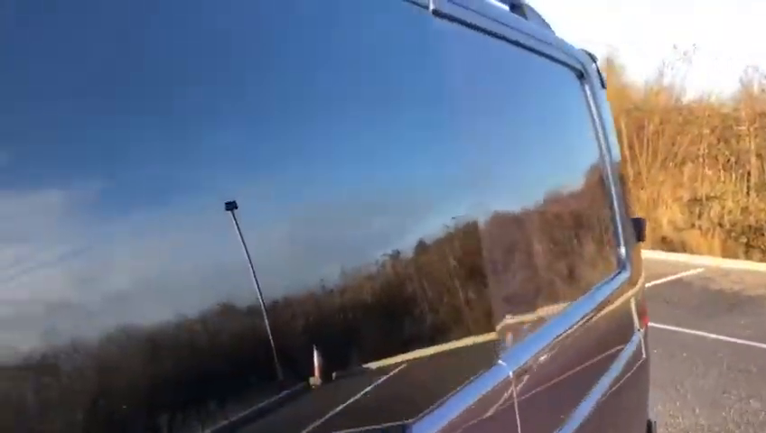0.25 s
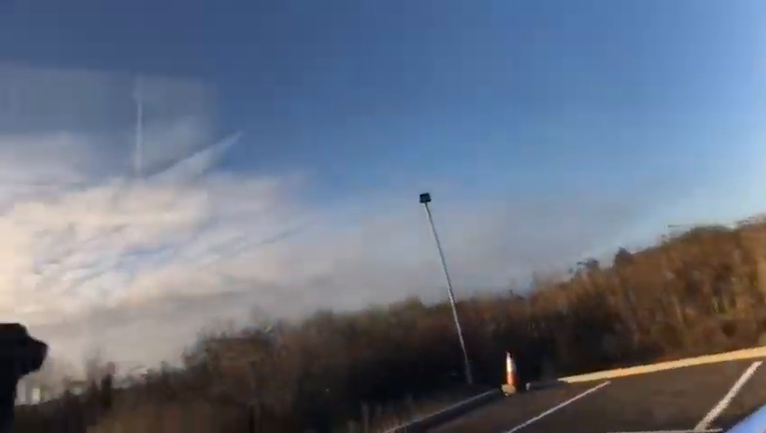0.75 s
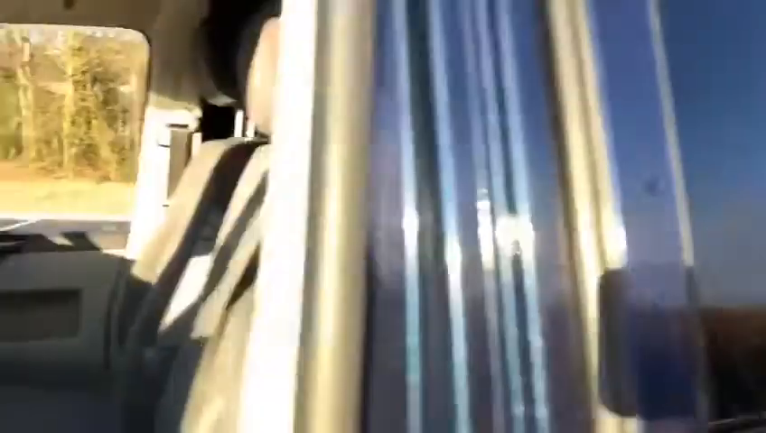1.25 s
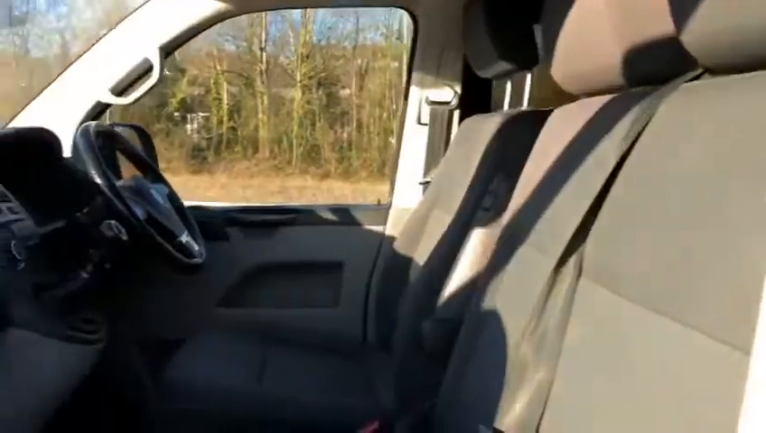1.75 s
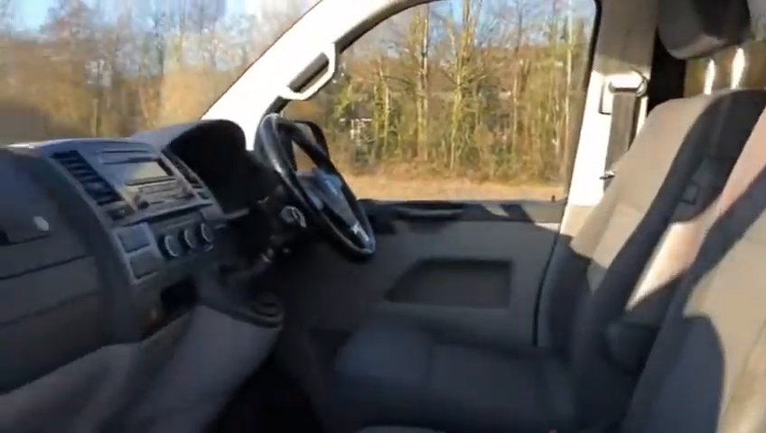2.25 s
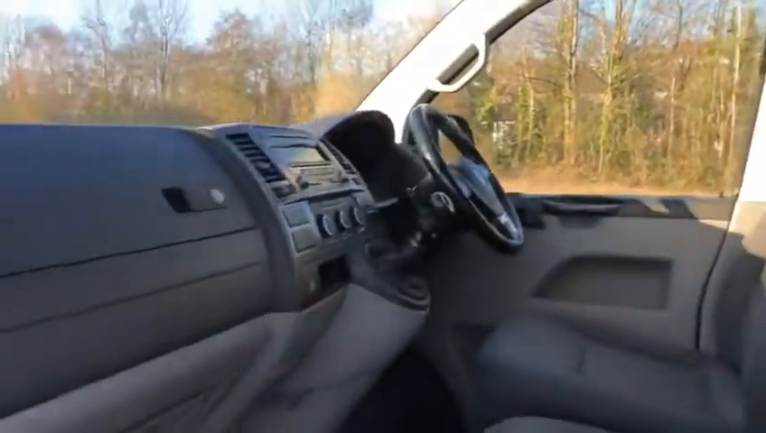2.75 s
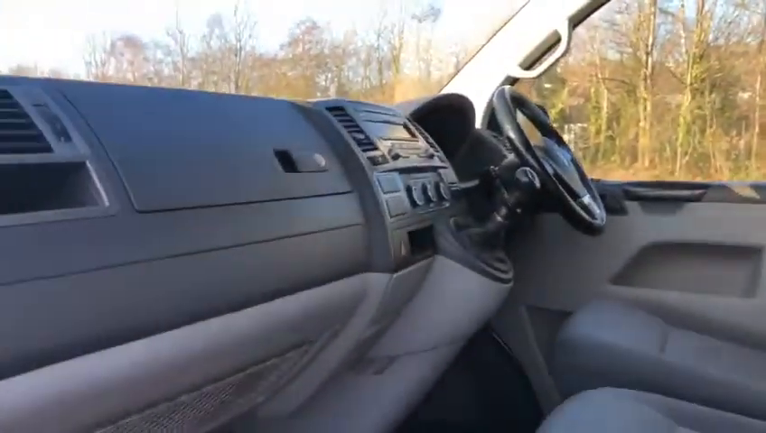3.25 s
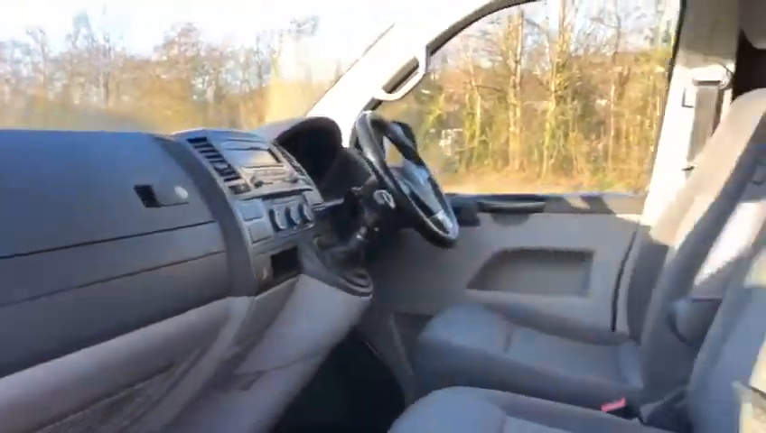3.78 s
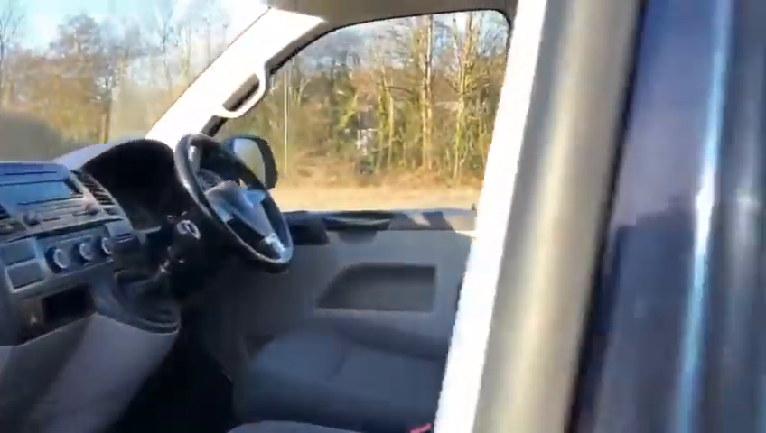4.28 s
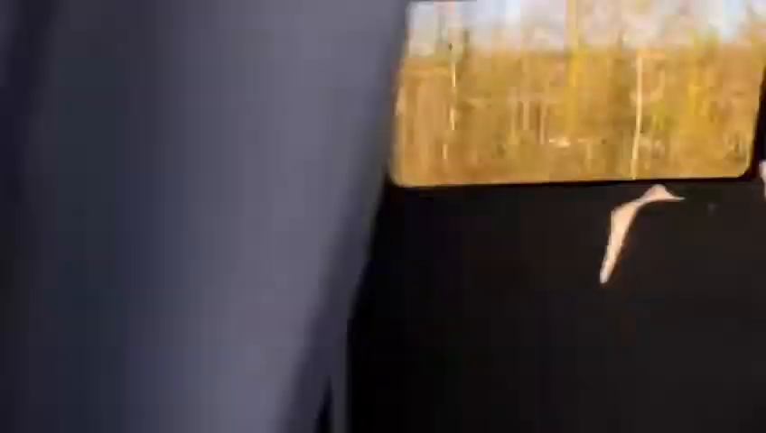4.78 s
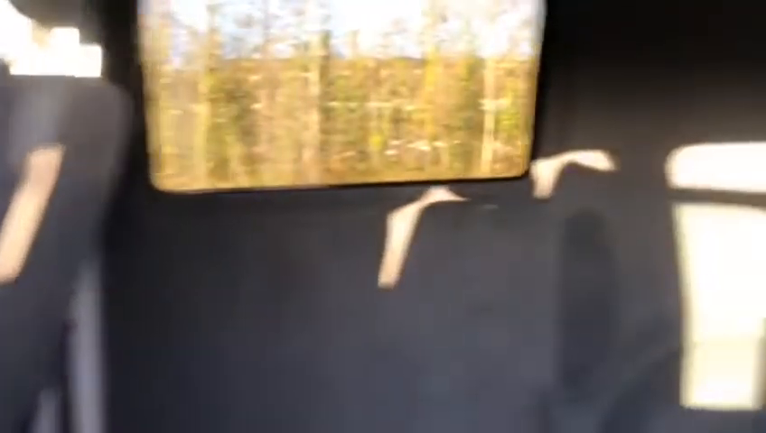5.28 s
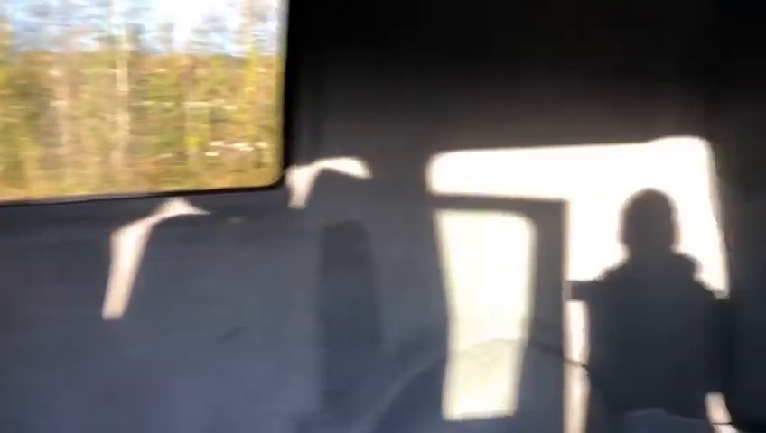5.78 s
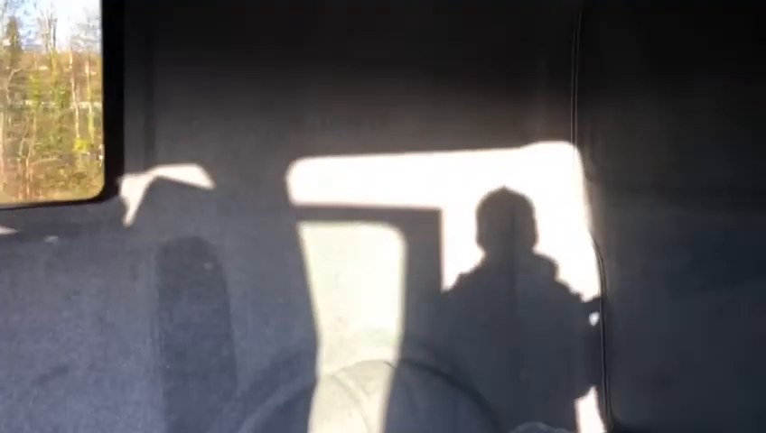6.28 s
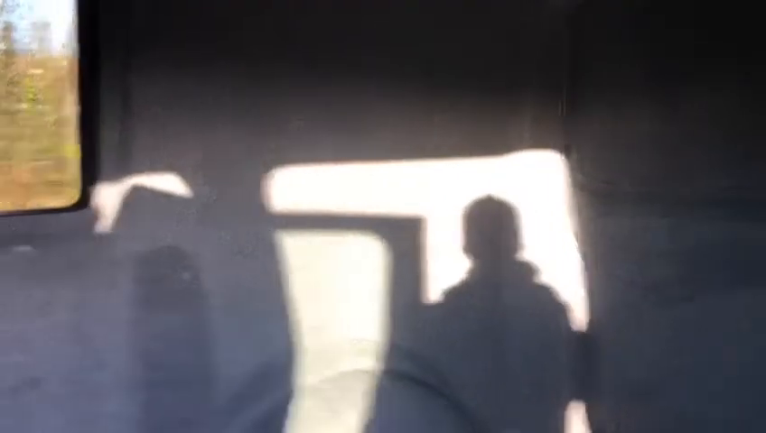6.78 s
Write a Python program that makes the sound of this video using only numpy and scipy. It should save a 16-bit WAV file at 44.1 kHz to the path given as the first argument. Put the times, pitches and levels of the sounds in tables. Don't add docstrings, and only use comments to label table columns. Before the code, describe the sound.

Close hand-held pickup in an open car park, with low distant traffic and soft wind. A loud lock snap comes first, then small clicks, scuffs and creaks in a long quiet stretch. A handle clicks, the van's side door breaks free with a heavy metallic clunk, and it rumbles along its rails with a brief dry roller squeal before rattling into its end stop.

```python
import sys
import numpy as np
from scipy import signal
from scipy.fft import rfft, irfft, next_fast_len
from scipy.io import wavfile
from scipy.ndimage import uniform_filter1d, map_coordinates

SR = 44100
rng = np.random.default_rng(int(sys.argv[2]) if len(sys.argv) > 2 else 0)


def how_loud(loudness_db):
    steps = np.asarray(loudness_db, float) / 20
    return 10 ** steps


def store_wav(level_fs):
    pcm = np.round(np.clip(np.atleast_2d(level_fs), -1, 1) * 32767)
    wavfile.write(sys.argv[1], SR, pcm.T.astype(np.int16))


N = 310023


def unit(x):
    return x / np.sqrt(np.mean(x ** 2) + 1e-20)


def add(out, s, x):
    seat = out[max(round(s * SR), 0):][:len(x)]
    seat += x[:len(seat)]


def curve(rows):
    s, db = np.transpose(rows)
    return how_loud(np.interp(np.arange(N) / SR, s, db, left=-140, right=-140))


def wobble(rate, n=N):
    knots = rng.standard_normal(int(n * rate / SR) + 4)
    return map_coordinates(knots, [np.arange(n) * rate / SR])


def swells(starts, lengths, levels_db, rise_s, t60):
    power = np.zeros(N)
    for s, hold, db in zip(starts, lengths, levels_db):
        t = np.arange(round((hold + 2 * t60) * SR)) / SR
        fade_db = db - 60 * np.clip(t - hold, 0, None) / t60
        add(power, s, (how_loud(fade_db) * np.clip(t / rise_s, 0, 1)) ** 2)
    return np.sqrt(power)


def filtered(x, response):
    m = next_fast_len(len(x) + min(len(x) // 3, 8192))
    return irfft(rfft(x, m) * response(np.fft.rfftfreq(m, 1 / SR)), m)[:len(x)]


def rush(spectrum, patchy_db, grit_db=0):
    z = signal.stft(rng.standard_normal(N), nperseg=512)[2]
    patches = uniform_filter1d(rng.standard_normal(z.shape), 5, 0)
    patches = unit(uniform_filter1d(patches, 10, 1))
    x = signal.istft(z * how_loud(patchy_db * patches), nperseg=512)[1][:N]
    x = x * how_loud(grit_db * wobble(150))
    f, db = np.transpose(spectrum)
    return unit(filtered(x, lambda hz: how_loud(np.interp(np.log(hz + 1), np.log(f + 1), db))))


def peak(f, hz, width):
    return 1j * f * width / (hz * hz - f * f + 1j * f * width)


def body(modes):
    def response(f):
        rings = sum((-1) ** k * how_loud(db) * peak(f, hz, w) for k, (hz, w, db) in enumerate(modes))
        return rings / (1 + 1j * f / 1500) ** 2
    return response


def burst(t, t60, rise, response):
    fade = how_loud(-60 * t / max(t60, .004)) + 1.38 * how_loud(-60 * t / 0.02)
    x = filtered(rng.standard_normal(len(t)) * fade * (1 - np.exp(-t / rise)), response)
    return x / np.abs(x).max()


def jolt(t, response):
    x = filtered(1. * (t == 0), response)
    return x / np.abs(x).max()


# time_s, level_db
ROAD_LEVEL = [(0, -40), (1, -42), (2.3, -45.5), (3.4, -44), (6.4, -46.5), (7.03, -45.5)]
# pitch_hz, level_db (per Hz)
ROAD_COLOUR = [(41, -37), (70, -2.5), (107, -3), (288, -11.5), (585, -15), (881, -15.5), (1190, -19),
               (2690, -39.5), (6000, -50.5), (7800, -77), (13200, -120)]


def traffic():
    return curve(ROAD_LEVEL) * rush(ROAD_COLOUR, patchy_db=2.5)


# time_s, level_db
WIND_LEVEL = [(0, -55), (.12, -37), (.3, -41.5), (.95, -41.5), (1.1, -30.5), (1.4, -42), (2.3, -42),
              (3.55, -46.5), (3.83, -21.5), (3.86, -25), (4.06, -30), (4.36, -30.5), (4.75, -38),
              (5.55, -45), (5.8, -29), (6.06, -23.5), (6.4, -43.5), (7.03, -54)]
# pitch_hz, level_db (per Hz)
BUFFET_COLOUR = [(12, -40), (20, -0.5), (48, 1), (63, 4.5), (81, -24), (130, -12), (170, -19), (290, -120)]


def wind():
    gusts = how_loud(1.6 * wobble(6)) * rush(BUFFET_COLOUR, patchy_db=-0.1)
    return curve(WIND_LEVEL) * how_loud(-0.5) * unit(gusts)


DRY_FROM_S, DRY_TO_S, TURNS_PER_S = 4.5, 5.03, 13.2


def bite():
    u = np.clip((np.arange(N) / SR - DRY_FROM_S) / (DRY_TO_S - DRY_FROM_S), 0, 1)
    return np.abs(np.sin(np.pi * u ** 0.95)) ** 0.86


# time_s, level_db
DOOR_SPEED = [(3.76, -30.5), (3.9, -35), (4.26, -25.5), (4.4, -27.5), (4.8, -22), (5.05, -26),
              (5.85, -28.5), (6.07, -29.5), (6.3, -53.5)]
# start_s, length_s, hiss_db, rasp_db (re hiss)
RUBS = [(0, 0.19, -62, 14), (0.387, 0.1, -50.5, 8.5), (0.498, .38, -69, 10), (1.032, .2, -54, 6.5),
        (1.556, 0.13, -63.5, 7), (1.7, 0.29, -70, -4), (2.556, 0.56, -55.5, -7), (2.636, 0.13, -54, 5),
        (3.232, 0.042, -48.5, 1), (3.495, .25, -54.5, 3), (3.844, 0.064, -55, -13), (4.21, 0.067, -58, -10),
        (4.113, 0.18, -63, -9), (5.412, 0.056, -51.5, 1), (5.78, .16, -50, 1), (5.95, 0.18, -69.5, 19),
        (6.146, 0.34, -66.5, 5), (6.346, 0.099, -55, 2), (6.456, .25, -65, 7)]
# pitch_hz, level_db (per Hz)
HISS_COLOUR = [(2060, 0.5), (3500, -2), (7200, -8.5), (10500, -10.5), (11500, -10), (15000, -42),
               (22000, -120)]
# pitch_hz, level_db (per Hz)
RASP_COLOUR = [(590, -45), (1000, 0.5), (1120, 0.5), (1570, -1.5), (5000, -21), (6500, -63), (11000, -120)]


def rubbing():
    s, hold, hiss_db, rasp_db = np.transpose(RUBS)
    rise_s, t60 = 0.05, 0.11
    roll, grip = curve(DOOR_SPEED), bite()
    hiss = swells(s, hold, hiss_db, rise_s, t60) + how_loud(-64.5) + roll * how_loud(-32.5) + grip * how_loud(-44.5)
    rasp = swells(s, hold, hiss_db + rasp_db, rise_s, t60) + how_loud(-66) + roll * how_loud(-21.5) + grip * how_loud(-37)
    sound = hiss * how_loud(-2.0) * rush(HISS_COLOUR, patchy_db=1.5, grit_db=1.0)
    sound += rasp * how_loud(-4.5) * rush(RASP_COLOUR, patchy_db=1.5, grit_db=2.0)
    t = np.arange(N) / SR
    dry = (t > DRY_FROM_S) * (t < DRY_TO_S)
    scrape_db = -2.2 * np.cos(2 * np.pi * TURNS_PER_S * (t - DRY_FROM_S)) * dry
    return sound * how_loud(scrape_db + 1.4 * wobble(12))


# start_s, peak_db
CREAK = [(.2745, -56), (.2883, -52), (.3102, -49), (.3262, -47), (.3400, -47), (.3530, -48), (.3666, -48),
         (.3831, -48)]
# start_s, peak_db
CRACKLE = [(.5800, -56), (.5920, -54), (.6160, -53), (.6425, -51), (.6530, -54), (.6610, -50), (.6720, -53),
           (.6800, -52), (.7019, -51), (.7188, -53)]
# start_s, peak_db
STRAY = [(1.6, -46), (1.766, -54), (1.885, -50), (1.913, -46), (1.944, -48), (1.9635, -43), (1.978, -50),
         (2.0855, -40), (.492, -44), (3.857, -44), (4.205, -42)]
# start_s, peak_db
FINE_TICKS = [(4.016, -52), (4.058, -50), (4.112, -46), (4.156, -48), (4.245, -48), (4.265, -44), (3.478, -38),
              (3.914, -44), (3.667, -10.5), (0.051, -23), (4.5884, -29.5)]


def slips():
    out, t = np.zeros(N), np.arange(SR // 50) / SR
    specks = [(CREAK, 4000, 3000), (CRACKLE, 6500, 3200), (STRAY, 3200, 3500), (FINE_TICKS, 7800, 6000)]
    for rows, hz, width in specks:
        for s, db in rows:
            noise = rng.standard_normal(len(t)) * how_loud(-60 * t / .009)
            grain = filtered(noise, lambda f: peak(f, hz, width) ** 2)
            add(out, s, how_loud(db - 3) * grain / np.abs(grain).max())
    return out


# pitch_hz, width_hz, level_db
HOUSING = [(348, 160, -1.5), (502, 130, -0.5), (596, 274, 0.5), (796, 420, -12.5)]
# start_s, peak_db, ring_hz, t60_s
CLICKS = [(.0441, -12.5, 2770, 0.071), (.4559, -26, 3430, 0.043), (.4723, -19.5, 2680, 0.025),
          (.7324, -37, 2100, .07), (1.1543, -32, 1010, 0.071), (1.637, -36, 3870, .03),
          (1.2206, -37.5, 1710, .078), (1.6447, -29, 2400, 0.04), (2.0648, -39, 2920, 0.064),
          (2.5486, -37, 3000, .084), (3.6844, -14, 1620, .06), (3.7245, -20, 1650, .05),
          (3.773, -33, 3400, .05), (4.7745, -14, 990, 0.028), (4.776, -24, 2100, 0.044),
          (5.862, -31.5, 2380, 0.048), (5.729, -32.5, 1590, 0.071), (5.9685, -36.5, 3000, 0.03),
          (6.0117, -25, 2120, 0.038), (6.106, -40, 1900, .03), (5.983, -38, 3500, .03),
          (6.047, -30, 1050, .05), (5.794, -27, 900, 0.037), (5.932, -36, 2300, .03),
          (6.098, -31.5, 1900, .05)]
# start_s, peak_db, ring_hz, t60_s
SNAPS = [(.149, -22, 2360, 0.053), (.2144, -37.5, 2470, 0.03), (.403, -30.5, 2400, 0.028),
         (.4269, -31, 2600, 0.027), (.4444, -32, 2040, 0.08), (1.2424, -36.5, 4500, 0.07),
         (1.5858, -44, 1560, 0.14), (3.088, -62, 1510, 0.078), (3.2565, -38.5, 1490, 0.14),
         (3.4685, -31.5, 2760, .025), (3.6634, -20, 1800, 0.29), (3.6676, -11, 1570, 0.083),
         (3.668, -9, 3290, 0.024), (4.2123, -34.5, 1900, 0.044), (4.2745, -25, 2400, 0.1),
         (4.5884, -31.5, 3300, 0.02), (5.79, -28, 1890, 0.086), (6.0422, -33.5, 3450, 0.06),
         (5.881, -27.5, 1770, 0.047)]
# start_s, peak_db, ring_hz, t60_s
KNOCKS = [(.0044, -33, 2010, 0.028), (2.5149, -38.5, 2750, 0.18), (2.5406, -40, 2300, 0.045),
          (3.2161, -38.5, 1460, 0.078), (3.4774, -33.5, 1580, 0.063), (3.5493, -30, 1920, 0.066),
          (3.7694, -33, 1900, 0.08), (4.1056, -36.5, 1670, 0.1), (4.1754, -40.5, 1650, 0.065),
          (5.0449, -36.5, 1750, 0.063), (5.1004, -36, 2900, 0.055), (5.4344, -42, 1610, 0.13),
          (5.6184, -38.5, 1830, 0.042)]
# start_s, peak_db, ring_hz, t60_s
SPITS = [(3.7491, -31, 1540, 0.11), (3.8674, -50, 1970, 0.37), (5.6654, -43.5, 2750, .12),
         (5.7955, -35.5, 1940, .05), (5.916, -26, 2260, 0.05), (5.911, -40, 3500, .03)]
# start_s, peak_db, ring_hz, t60_s
DULL = [(.1194, -23, 1800, .04), (.1225, -21, 740, .04), (3.5115, -29.5, 1150, .04),
        (3.9055, -27.5, 780, .05), (3.4705, -31.5, 760, .07), (6.0868, -35, 2600, .025),
        (6.095, -32.5, 2900, .026), (5.999, -25.5, 950, .05), (3.7335, -11, 600, .03),
        (4.277, -20.5, 1050, 0.062), (1.588, -34.5, 440, 0.044), (5.9705, -22, 780, .07)]


def contacts():
    out, t = np.zeros(N), np.arange(SR // 6) / SR
    kinds = [(CLICKS, -25, -9), (SNAPS, -13.5, -1), (KNOCKS, -16.5, 8), (SPITS, 1.1, 7.4), (DULL, -37.5, -6)]

    def bright(f):
        return peak(f, 7240, 6700) ** 2

    for s, db, hz, t60, treble_db, knock_db in [(*row, *kind) for rows, *kind in kinds for row in rows]:
        def metal(f):
            ringing = peak(f, hz, 0.19 * hz) + 0.3 * peak(f, 3440, 2800)
            return ringing * peak(f, hz, 1.64 * hz) ** 2

        crack = 0.87 * burst(t, t60, 0.0005, metal)
        crack += 0.62 * jolt(t, lambda f: peak(f, 1.14 * hz, 1.5 * hz) ** 3)
        spit = jolt(t, bright) + burst(t, 0.2 * t60, 0.0003, bright)
        spit += 0.33 * burst(t, 0.91 * t60, 0.0047, bright)
        knock = burst(t, 2.0 * t60, 0.00057, body(HOUSING))
        ring = 0.38 * np.sin(2 * np.pi * hz * t) * how_loud(-60 * t / (0.63 * t60)) * (1 - np.exp(-t / 0.00093))
        hit = crack + how_loud(treble_db + 7.5) * spit + how_loud(knock_db - 1.5) * knock + ring
        add(out, s, how_loud(db) * hit)
        rebound = burst(t, .7 * t60, .001, metal)
        rebound += how_loud(treble_db + 7) * burst(t, .3 * t60, .0008, bright)
        add(out, s + rng.uniform(.003, .009), how_loud(db - 14.5) * rebound)
    return out


# start_s, peak_db
BOLT = [
    (0.0398, -22),
    (0.0448, -6),
    (0.048, 2),
]
# pitch_hz, width_hz, level_db
DOOR_SKIN = [(73.6, 17, 4), (133, 65, 1), (278.5, 52, 2.5), (333.5, 72, 3.5), (384, 160, -2),
             (596, 170, -6.5), (945, 77, -9.5)]


def lock():
    out, t = np.zeros(N), np.arange(SR // 3) / SR
    for s, db in BOLT:
        housing = sum(how_loud(level - 28 * w * t * 0.64) * np.sin(2 * np.pi * hz * t) for hz, w, level in HOUSING)
        housing = how_loud(-2.5) * housing * (1 - np.exp(-t / 0.0014))
        rattle = 0.28 * burst(t, .09, 0.0016, body(HOUSING + DOOR_SKIN[1:3]))
        crack = 0.22 * burst(t, 0.076, 0.00034, lambda f: peak(f, 2200, 1400) ** 2)
        thump = how_loud(-21.0 - 60 * t / 0.44) * np.sin(2 * np.pi * 48 * t)
        add(out, s, how_loud(db) * (housing + rattle + crack + thump))
    return out


# start_s, length_s, level_db, pitch_hz
TURNS = [(4.512, 0.076, -57, 1850), (4.588, 0.076, -52, 1850), (4.643, .035, -37, 1990),
         (4.66, .06, -27.5, 1870), (4.70, 0.085, -35.5, 1850), (4.72, 0.052, -33.5, 1564),
         (4.754, 0.043, -35, 1675), (4.811, 0.053, -36, 1860), (4.839, 0.064, -43, 1900),
         (4.893, 0.048, -39, 1560), (4.897, 0.048, -41, 1790), (4.964, 0.09, -54, 1600)]
# pitch_hz, roughness_hz, level_db
RAIL_RINGS = [(3160, 110, -52), (8450, 430, -60)]
# start_s, length_s, level_db, pitch_hz, roughness_hz
SQUEAKS = [(0.52, 0.48, -68, 3400, 220), (0.727, 0.035, -48.5, 2090, 390), (5.813, .03, -61, 5760, 100),
           (1.122, 0.11, -53, 1600, 401), (.76, 0.068, -67, 4150, 60), (2.772, 0.062, -60, 3300, 60),
           (4.635, .14, -50, 3780, 60), (4.735, .06, -46, 3300, 200), (4.812, .025, -48, 3500, 80),
           (5.85, 0.039, -47, 2620, 50), (5.825, .04, -54, 2450, 60), (3.54, 0.14, -61.5, 4200, 148),
           (5.795, 0.074, -58, 8850, 60), (3.89, 0.013, -57, 5600, 60), (5.807, 0.027, -50, 2270, 150),
           (5.827, 0.031, -51, 3950, 40), (5.982, .012, -56, 6200, 250), (6.005, .04, -58, 3350, 50),
           (6.53, 0.49, -71, 3470, 200), (6.55, .4, -74, 4150, 180), (.51, .25, -71, 4150, 160),
           (5.853, .025, -58, 5150, 90), (5.8, .03, -58, 6300, 120)]
# start_s, length_s, level_db, roughness_hz
STACKS = [
    (3.243, .06, -54.5, 130),
    (5.83, .052, -44, 25),
]
# pitch_hz, level_db
STACK_PARTS = [
    [(2950, 0.5), (5950, -3), (7600, -7), (9300, -9), (11200, -6)],
    [(5100, -16), (7650, -21), (10250, 4.5)],
]
QUICK, EVEN, PEAKED = (.52, 0.84), (0.76, 1.3), (0.93, 3.6)


def partials():
    tones = [(*row, QUICK) for row in SQUEAKS]
    for s, length, db, hz in TURNS:
        tones.append((s, length, db, hz, 42, EVEN))
        tones.append((s, length, db - 18, 2 * hz, 84, EVEN))
        for ring_hz, rough, ring_db in RAIL_RINGS:
            tones.append((s, length, ring_db + 0.4 * (db + 36), ring_hz, rough, QUICK))
    for (s, length, db, rough), parts in zip(STACKS, STACK_PARTS):
        for hz, part_db in parts:
            tones.append((s, length, db + part_db, hz, rough, PEAKED))
    return tones


def squeals():
    out = np.zeros(N)
    for s, length, db, hz, rough_hz, (lean, sharp) in partials():
        n = SR // 2 if length > .2 else SR // 8
        u = np.clip(np.arange(n) / SR / length, 0, 1)
        pitch = hz * (1 + .012 * (.5 - u)) + 0.396 * rough_hz * wobble(149.8, n)
        turn = 2 * np.pi * np.cumsum(pitch) / SR
        depth, rate = rough_hz / 80, 250 + 3 * rough_hz
        tone = (1 + depth * wobble(rate, n)) * np.sin(turn) + depth * wobble(rate, n) * np.cos(turn)
        swell = np.abs(np.sin(np.pi * u ** lean)) ** sharp * (u < 1) * how_loud(2.3 * wobble(88, n))
        add(out, s, 1.88 * how_loud(db) * swell * tone / np.sqrt(1 + depth ** 2))
    return out


# start_s, length_s, level_db, pitch_hz, width_hz
DRONES = [(4.05, .85, -32.5, 248, 21), (4.33, .14, -28, 82, 14), (4.58, 0.31, -36, 505, 35),
          (4.55, 0.28, -38, 453, 25), (4.8, 0.27, -32, 207, 18), (5.15, 0.31, -38, 405, 25),
          (5.3, 0.34, -35.5, 215.2, 25), (5.5, 0.33, -39.5, 429.4, 27), (5.7, .15, -37, 351, 20),
          (4.64, .16, -39, 1850, 600), (4.81, .13, -43, 1900, 700), (4.6, .2, -50, 3500, 900),
          (5.95, .15, -40, 950, 500), (3.73, .09, -22, 260, 120)]


def drones():
    out = np.zeros(N)
    for s, length, db, hz, width in DRONES:
        u = np.arange(round(length * SR)) / (length * SR)
        hum = unit(filtered(rng.standard_normal(len(u)), lambda f: peak(f, hz, width) ** 2))
        add(out, s, how_loud(db) * np.sin(np.pi * u) ** .6 * hum)
    return out


# start_s, peak_db, boom_db (re peak), clang_db (re peak), t60_s
BLOWS = [(.151, -24, -18, -3, 0.13), (.119, -19, -20, -6, .08), (0.406, -25, -20, -20, 0.15),
         (.421, -24, -20, -24, 0.13), (1.067, -23.5, 10, -19, 0.47), (1.584, -25.5, -20, -15, 0.058),
         (2.544, -27.5, -14, 1, 0.15), (3.47, -30, -23, -8, 0.32), (3.55, -19.5, -20, -4.5, 0.33),
         (3.676, 2, -2.5, -10, 0.17), (3.687, -4.5, -7, -8, 0.28), (3.699, -13, -4, 2.5, 0.25),
         (3.715, -13.5, 14, -12, 0.16), (3.724, -2.5, -17, -8, 0.076), (3.7325, -1.5, -9, -17, 0.11),
         (3.746, -6, -12, -32, 0.25), (3.899, -20, -9, -27, 0.14), (5.918, -14.5, -10, -14, 0.1),
         (5.968, -21.5, -4, -9, 0.57), (6.0, -22, -12, -5, 0.34), (6.039, -17.5, -14, -4, 0.28)]


def clunk():
    out, t = np.zeros(N), np.arange(SR // 2) / SR
    bounce_hz, bounce_t60_s = 43, .3
    for s, db, boom_db, clang_db, t60 in BLOWS:
        skin = 0.84 * burst(t, t60, 0.0016, body(DOOR_SKIN)) + 0.56 * jolt(t, body(DOOR_SKIN))
        air = .5 * burst(t, 0.71 * t60, .003, lambda f: peak(f, 116.6, 94) ** 2)
        clang = burst(t, 0.66 * t60, 0.00029, lambda f: peak(f, 1140, 890) ** 2 * peak(f, 620, 1300))
        bounce = np.sin(2 * np.pi * bounce_hz * (s - 3.697 + t))
        bounce = bounce * how_loud(-60 * t / bounce_t60_s) * (1 - np.exp(-t / 0.005))
        add(out, s, how_loud(db - 4.5) * (skin + air + how_loud(clang_db) * clang + how_loud(boom_db - 3.5) * bounce))
    return out


# start_s, length_s, level_db
SURGES = [(3.756, 0.04, -28), (4.164, 0.14, -26), (4.324, 0.38, -31), (4.695, 0.31, -22),
          (5.023, 0.41, -25), (5.351, 0.17, -20.5), (5.641, 0.13, -19), (5.857, 0.078, -27),
          (5.985, 0.047, -21.5)]
# time_s, pitch_hz
CABIN_NOTE = [(4.15, 130), (4.37, 107), (4.44, 131), (4.48, 118), (5.11, 120), (5.47, 131), (5.69, 111.9),
              (5.88, 127), (6.15, 111.2)]
# pitch_hz, level_db (per Hz)
PANEL_COLOUR = [(29, -59), (50, -10.5), (119, -2), (167, -6.5), (248, -3.5), (320, -10), (469, -10),
                (521, -15), (599, -20.5), (800, -19.5), (1040, -32.5), (1760, -120)]
# pitch_hz, level_db (per Hz)
RAIL_COLOUR = [(350, -24), (600, 3.5), (1370, -6), (1880, -8.5), (2500, -25), (3250, -58), (5500, -120)]
# pitch_hz, width_hz, level_db
ROLLING_SKIN = [(85, 14, -3), (242, 39, -3), (314, 46, -9.5), (419, 35, -2), (521, 44, 1)]


def rolling():
    surge = swells(*np.transpose(SURGES), rise_s=0.036, t60=0.61)
    note = np.interp(np.arange(N) / SR, *np.transpose(CABIN_NOTE)) + 2 * wobble(14)
    hum = np.sin(2 * np.pi * np.cumsum(note) / SR)
    churn = unit(filtered(rng.standard_normal(N), lambda f: peak(f, 116.9, 29) ** 2))
    cabin = surge * unit(hum + .6 * churn)

    def skin(f):
        return 1 + 0.68 * sum(how_loud(db) * peak(f, hz, w) for hz, w, db in ROLLING_SKIN)

    speed = curve(DOOR_SPEED)
    rail = speed * how_loud(-18) + bite() * how_loud(-36.5)
    shaken = speed * how_loud(1.05) * unit(filtered(rush(PANEL_COLOUR, patchy_db=0.7), skin))
    shaken += rail * how_loud(-1.5) * rush(RAIL_COLOUR, patchy_db=5.0, grit_db=-0.5)
    return cabin + how_loud(.5 * wobble(16)) * shaken


def scene():
    background = traffic() + wind() + rubbing()
    details = slips() + contacts() + lock() + squeals()
    door = drones() + clunk() + rolling()
    return (background + details + door)[None]


def top_cut(x):
    return signal.sosfilt(signal.butter(12, 12270, fs=SR, output="sos"), x)


def record(dry):
    soft = dry[0] / (1 + np.abs(dry[0] / .92) ** 4) ** (1 / 4)
    dull = filtered(soft, lambda f: (f < 12270) / (1 + (f / 11500) ** 24))
    return top_cut(dull[None])


dry = scene()
out = record(dry)
store_wav(out)
```